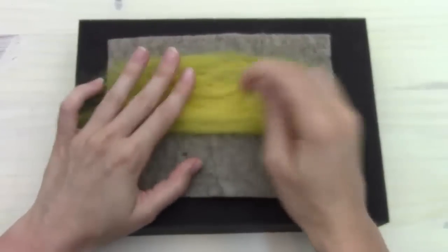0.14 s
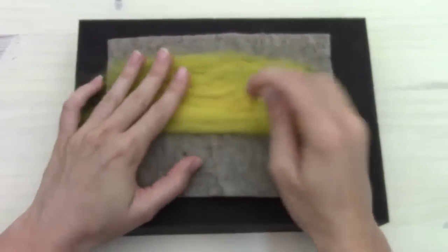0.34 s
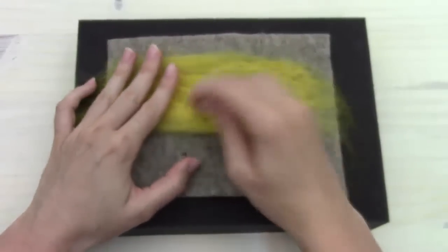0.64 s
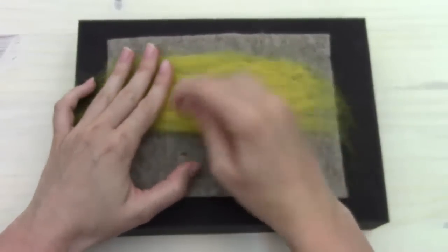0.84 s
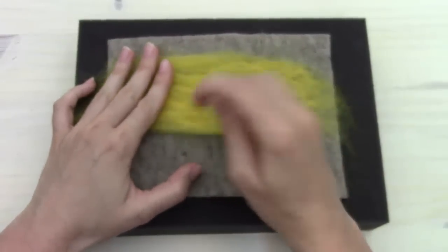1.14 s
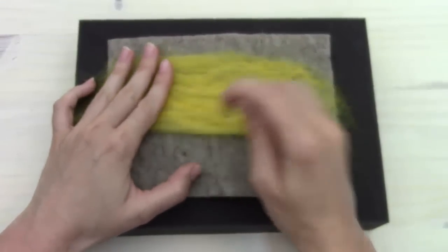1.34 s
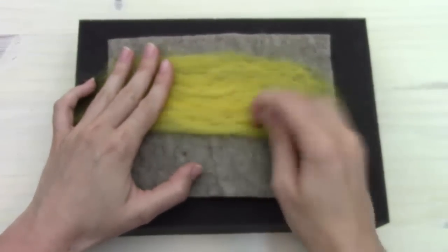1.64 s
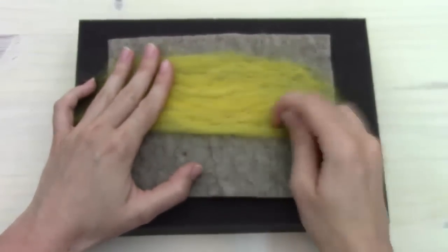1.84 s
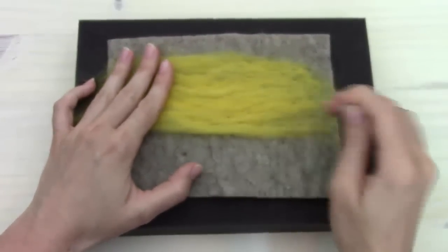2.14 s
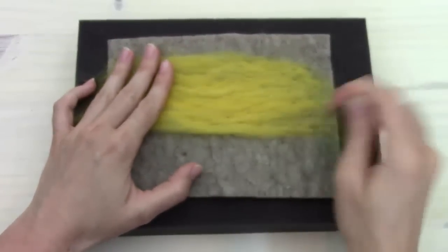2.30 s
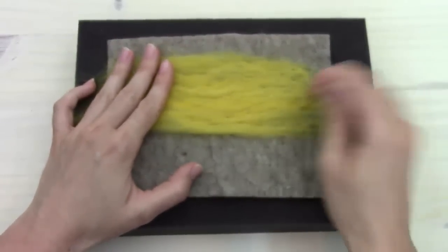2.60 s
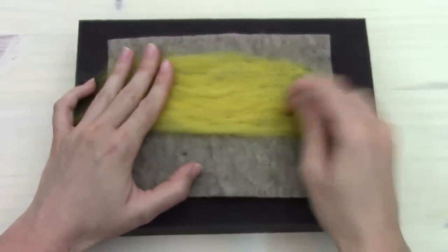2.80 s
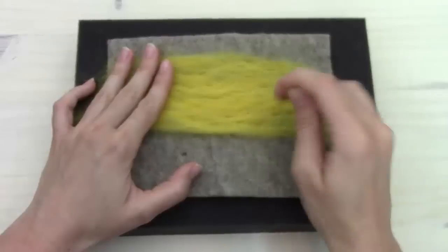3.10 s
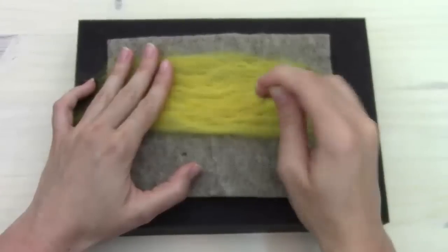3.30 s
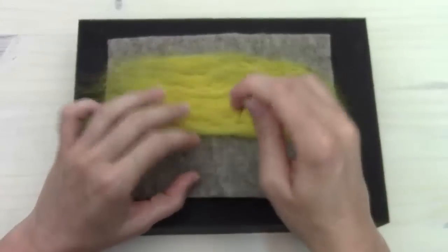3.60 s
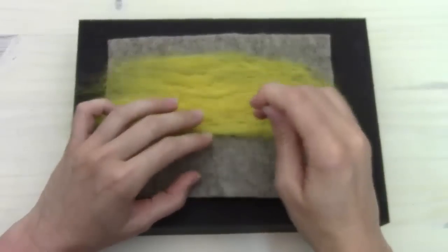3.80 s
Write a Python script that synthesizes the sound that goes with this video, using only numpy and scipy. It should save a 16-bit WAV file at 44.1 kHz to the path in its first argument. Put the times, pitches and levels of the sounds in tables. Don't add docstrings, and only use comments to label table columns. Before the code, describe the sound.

Quick, steady crunchy stabs of a felting needle into a foam mat, the table thudding softly.

```python
import sys
import numpy as np
from scipy import signal
from scipy.fft import rfft, irfft, next_fast_len
from scipy.io import wavfile
from scipy.ndimage import uniform_filter1d

SR = 44100
rng = np.random.default_rng(int(sys.argv[2]) if len(sys.argv) > 2 else 0)


def materialize(psi):
    bounded = np.clip(np.atleast_2d(psi).T, -1, 1)
    quanta = np.round(bounded * 32767).astype(np.int16)
    wavfile.write(sys.argv[1], SR, quanta)


def convert_level_to_amplitude(level_db):
    exponent = np.asarray(level_db, float) / 20
    return 10 ** exponent


N = 174195

# frequency in Hz, density in dB per Hz.
AIR = [(12, -26.5), (22, 2), (36, -12), (87, -20.5), (240, -29), (500, -36.5), (1500, -42), (4000, -45)]
AIR_DB = -51

# bottom of the stroke in seconds, force from 0 to 2.
PUSHES = [(-.115, .6), (.0774, .92), (.2774, 1.25), (.4834, .87), (.6857, .74), (.8829, 1.18),
          (1.0772, 1.06), (1.2729, 1.42), (1.4688, 1.4), (1.6697, 1.21), (1.8646, 1.41), (2.0582, .83),
          (2.2417, 1.07), (2.4601, .47), (2.6576, .86), (2.8436, .84), (3.038, 1.04), (3.2336, 1.09),
          (3.4331, .75)]
# frequency in Hz, signed swing in full scale, t60 in seconds.
ROCKING = [(12.73, .022, 1.58), (17.56, -.077, 1.09), (21.57, .036, .45), (26.56, .04, .46)]
# frequency in Hz, level in dB, t60 in seconds.
TOP_MODES = [(55.6, -45, 0.75), (102.5, -53.5, .15), (143, -47.5, 0.21), (173.5, -47, 0.25),
             (217.6, -67.5, 0.36)]
TOP_RISE_S = 0.018
# frequency in Hz, density in dB per Hz.
SHUDDER = [(30, -1.5), (50, 0), (80, -12), (160, -15), (260, -22.5), (400, -34)]
SHUDDER_DB, SHUDDER_RISE_S, SHUDDER_T60_S, SHUDDER_EARLY_S = -45.5, 0.014, 0.38, 0.05

# start of the crunch in seconds, level in dB, lead-in through the wool in seconds,
# foam crackle in dB, shaft buzz in dB.
JABS = [(0.0507, -31.5, 0.02, -3.5, 2.5), (0.2492, -31.5, 0.028, -1.5, -3), (0.4594, -34, 0.03, 0, -0.5),
        (0.6588, -33.5, 0.033, 1.5, 1.5), (0.8558, -32, 0.036, -1, -1.5), (1.051, -32, 0.046, -1.5, 3),
        (1.246, -31.5, 0.013, -0.5, 5.5), (1.443, -32.5, 0.029, 0.5, 3), (1.6455, -32, 0.0085, 2, 4.5),
        (1.8368, -32, 0.022, 2.5, 6), (2.034, -32.5, 0.036, 2, -3), (2.212, -32.5, 0.037, 2.5, -4),
        (2.435, -30, 0.034, 1, -2), (2.6317, -33, 0.027, 3, 2), (2.8203, -32, 0.031, -3, 2),
        (3.012, -33, 0.035, 2, 0.5), (3.207, -34, 0.05, 5, 2), (3.4066, -35.5, 0.034, -1.5, 4.5)]
# level in dB, pitch in Hz.
HOLLOW_NOTES = [(-42.5, 350), (-50, 575), (-47.5, 636), (-42.5, 570), (-42, 718), (-46, 830), (-45, 850),
                (-40, 774), (-44, 800), (-44, 770), (-52, 800), (-55, 850), (-57.5, 480), (-47, 447),
                (-41, 520), (-44.5, 487), (-46, 560), (-51, 570)]

# frequency in Hz, width in Hz, level in dB.
FREE_SHAFT = [(2250, 350, -5), (3500, 500, -6), (4100, 400, 0)]
TOUCH_DB, TOUCH_RISE_S, FREE_LEAD_DB, FREE_T60_S = -23, 0.014, 22, 0.095
TOUCH_SHARE = 0.53
# frequency in Hz, width in Hz, level in dB.
FELT = [(278, 167, -5), (654, 408, -2.5), (1526, 279, -0.5), (2400, 443, -5), (3350, 1180, -5.5),
        (4080, 1900, -8.5)]
FELT_DB, FELT_HOLD_S, FELT_T60_S, FELT_LEAD_DB = -8.5, 0.02, 0.064, 34.5
PULL_DB, PULL_AFTER_S, PULL_S = -33.5, 0.066, 0.014
# frequency in Hz, width in Hz, level in dB.
GRIPPED_SHAFT = [(3550, 600, -4), (4050, 550, 0), (4500, 500, 0)]
SHAFT_DB, SHAFT_HOLD_S, SHAFT_T60_S = -12.5, 0.011, 0.035
# frequency in Hz, width in Hz, level in dB.
FOAM = [(6530, 1670, 0), (8400, 1760, 1.5), (10130, 4500, -0.5), (11570, 7500, -1.5), (13860, 7000, -2.5)]
FOAM_DB, FOAM_LATE_S, FOAM_HOLD_S, FOAM_T60_S = -3.5, 0.001, 0.019, 0.074
FOAM_LEAD_DB, FOAM_SWELL_DB = 47, 3
NOTE_WIDTH_HZ, NOTE_LATE_S = 120, 0.0058
NOTE_RISE_S, NOTE_RISE_DB, NOTE_HOLD_S, NOTE_T60_S = 0.023, 19, 0.014, 0.048

DETUNE, UNEVEN_DB = 0.03, 1.5
SNAPS_PER_S, SNAP_SCATTER_DB, SNAP_CAP_DB, SNAP_SHARE = 1800, 5, 10, 0.7
FLUTTER_DB = 2.4

# frequency in Hz, t60 in seconds.
ROOM = [(200, 0.24), (1500, 0.27), (6000, 0.2), (14000, 0.2)]
ROOM_DB = -8

# frequency in Hz, density in dB per Hz.
HISS = [(30, 20.5), (200, 10), (800, 8), (4000, 4), (9000, -0.5), (11800, 2), (13000, -7.5), (15600, -3)]
HISS_DB = [-66, -63]
LEAK_DB, LEAK_HZ, LEAK2_HZ = -18.7, 42, 110
TOP_HZ = 15680


def along(points, hz):
    f, v = np.transpose(points)
    return np.interp(np.log(hz + 1), np.log(f + 1), v)


def unit(x):
    return x / np.sqrt(np.mean(x ** 2) + 1e-20)


def filtered(x, response):
    size = x.shape[-1]
    m = next_fast_len(size + 8192)
    return irfft(rfft(x, m) * response(np.fft.rfftfreq(m, 1 / SR)), m)[..., :size]


def noise(spectrum, channels):
    white = rng.standard_normal((channels, N))
    return unit(filtered(white, lambda hz: convert_level_to_amplitude(along(spectrum, hz)) * (hz > 8)))


def table():
    out = np.zeros(N + 3 * SR)
    t = np.arange(SR + SR // 2) / SR
    rock = sum(swing * convert_level_to_amplitude(-60 * t / t60) * np.sin(2 * np.pi * hz * t) for hz, swing, t60 in ROCKING)
    for s, force in PUSHES:
        hum = np.zeros(len(t))
        for hz, db, t60 in TOP_MODES:
            decay = convert_level_to_amplitude(db + rng.normal(0, 3.14) - 60 * t / t60)
            cycles = hz * rng.normal(1, 0.035) * t + rng.random()
            hum += decay * np.sin(2 * np.pi * cycles)
        push = force * (rock + hum * (1 - np.exp(-t / TOP_RISE_S)))
        out[SR + round(s * SR):][:len(t)] += push
    return out[SR:SR + N]


def shudder():
    s, force = np.transpose(PUSHES)
    ms = np.arange(0, N / SR, 1e-3)
    t = np.maximum(ms - s[:, None] + SHUDDER_EARLY_S, 0)
    swell = force[:, None] * (1 - np.exp(-t / SHUDDER_RISE_S)) * convert_level_to_amplitude(-60 * t / SHUDDER_T60_S)
    envelope = np.interp(np.arange(N) / SR, ms, np.sqrt((swell ** 2).sum(axis=0)))
    return convert_level_to_amplitude(SHUDDER_DB) * envelope * noise(SHUDDER, channels=1)[0]


def resonant(x, peaks):
    def response(f):
        total = 0
        for k, (c, w, db) in enumerate(peaks):
            total = total + (-1) ** k * convert_level_to_amplitude(db) * 1j * f * w / (c * c - f * f + 1j * f * w)
        return total
    return unit(filtered(x, response))


def snaps(size):
    sizes = convert_level_to_amplitude(np.minimum(SNAP_SCATTER_DB * rng.exponential(size=size), SNAP_CAP_DB))
    hits = (rng.random(size) < SNAPS_PER_S / SR) * sizes * np.sign(rng.standard_normal(size))
    flutter = unit(uniform_filter1d(rng.standard_normal(size), size=130))
    rub = np.sqrt(1 - SNAP_SHARE) * rng.standard_normal(size)
    return (np.sqrt(SNAP_SHARE) * unit(hits) + rub) * convert_level_to_amplitude(FLUTTER_DB * flutter)


def rubbed(t, peaks):
    return resonant(snaps(size=len(t)), peaks)


def varied(peaks):
    return [(c * (1 + DETUNE * rng.standard_normal()), w, db + UNEVEN_DB * rng.standard_normal())
            for c, w, db in peaks]


def stroke(t, lead_s, lead_db, hold_s, t60, swell_db=0):
    lead = lead_db * np.minimum(t, 0) / lead_s
    swell = swell_db * (np.clip(t / hold_s, 0, 1) - 3)
    decay = -60 * np.maximum(t - hold_s, 0) / t60
    return convert_level_to_amplitude(lead + swell + decay)


def free_ring(t, lead_s):
    early_s = TOUCH_SHARE * lead_s
    shape = stroke(t + early_s, TOUCH_RISE_S, FREE_LEAD_DB, early_s, FREE_T60_S)
    return convert_level_to_amplitude(TOUCH_DB) * shape * resonant(rubbed(t, FREE_SHAFT), FREE_SHAFT)


def felt_tear(t, lead_s):
    tear = convert_level_to_amplitude(FELT_DB) * stroke(t, lead_s, FELT_LEAD_DB, FELT_HOLD_S, FELT_T60_S)
    pull = convert_level_to_amplitude(PULL_DB) * np.exp(-0.5 * ((t - PULL_AFTER_S) / PULL_S) ** 2)
    return (tear + pull) * rubbed(t, varied(FELT))


def shaft_buzz(t, lead_s, buzz_db):
    shape = stroke(t, lead_s, FOAM_LEAD_DB, SHAFT_HOLD_S, SHAFT_T60_S)
    return convert_level_to_amplitude(SHAFT_DB + buzz_db) * shape * resonant(rubbed(t, GRIPPED_SHAFT), GRIPPED_SHAFT)


def foam_crackle(t, lead_s, crackle_db):
    shape = stroke(t - FOAM_LATE_S, lead_s, FOAM_LEAD_DB, FOAM_HOLD_S, FOAM_T60_S, FOAM_SWELL_DB)
    return convert_level_to_amplitude(FOAM_DB + crackle_db) * shape * rubbed(t, varied(FOAM))


def hollow_note(t, note_db, hz):
    shape = stroke(t - NOTE_LATE_S, NOTE_RISE_S, NOTE_RISE_DB, NOTE_HOLD_S, NOTE_T60_S)
    note = unit(shape * rubbed(t, [(hz, NOTE_WIDTH_HZ, 0)]))
    return convert_level_to_amplitude(note_db) * note * np.sqrt(np.mean(shape ** 2))


def room(x):
    hz, t, z = signal.stft(rng.standard_normal(SR // 3), SR, nperseg=256)
    decay = convert_level_to_amplitude(-60 * t / along(ROOM, hz)[:, None])
    tail = signal.istft(z * decay, SR, nperseg=256)[1]
    return signal.fftconvolve(x, tail / np.linalg.norm(tail))


def needle():
    before, out = SR // 16, np.zeros(N + 2 * SR)
    t = (np.arange(SR // 4) - before) / SR
    for (s, db, lead_s, crackle_db, buzz_db), (note_db, hz) in zip(JABS, HOLLOW_NOTES):
        jab = free_ring(t, lead_s) + felt_tear(t, lead_s)
        jab += shaft_buzz(t, lead_s, buzz_db) + foam_crackle(t, lead_s, crackle_db)
        direct = convert_level_to_amplitude(db) * jab + hollow_note(t, note_db, hz)
        heard = convert_level_to_amplitude(ROOM_DB) * room(direct)
        heard[:len(direct)] += direct
        out[SR + round(s * SR) - before:][:len(heard)] += heard
    return out[SR:SR + N]


def scene():
    air = convert_level_to_amplitude(AIR_DB) * noise(AIR, channels=1)[0]
    return np.array([air + table() + shudder() + needle(), np.zeros(N)])


def low_pass(x):
    return signal.sosfilt(signal.butter(12, 15820, fs=SR, output="sos"), x)


def record(dry):
    leak = -convert_level_to_amplitude(LEAK_DB) * filtered(dry[0], lambda f: 1 / (1 + 1j * f / LEAK_HZ) / (1 + 1j * f / LEAK2_HZ))
    hiss = convert_level_to_amplitude(np.array(HISS_DB))[:, None] * noise(HISS, channels=2)
    mix = np.array([dry[0], dry[1] + leak]) + hiss
    mix = filtered(mix, lambda hz: hz < TOP_HZ)
    return low_pass(mix)


dry = scene()
out = record(dry)
materialize(out)
```